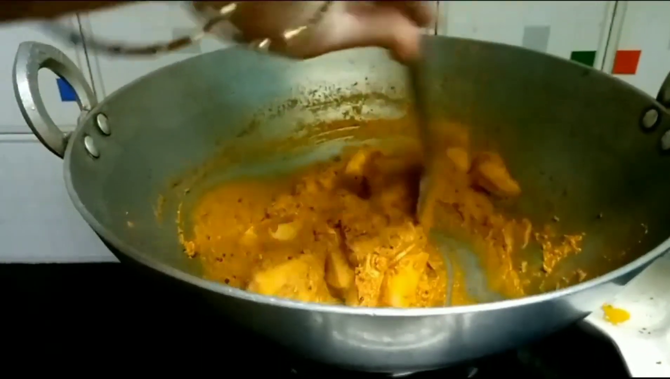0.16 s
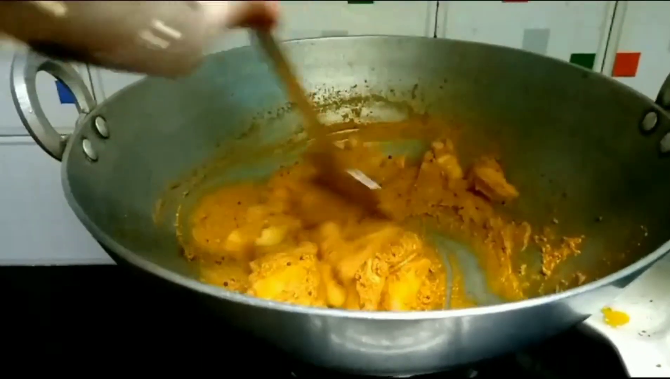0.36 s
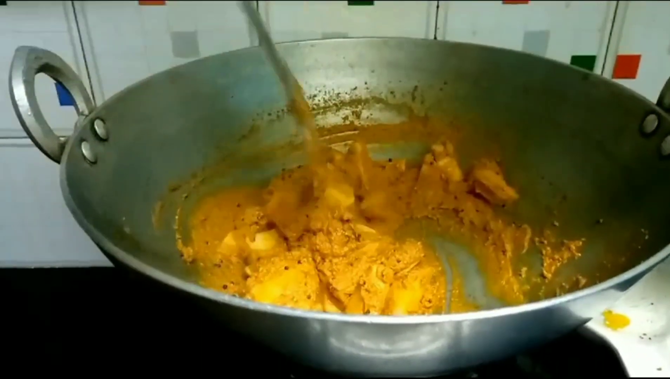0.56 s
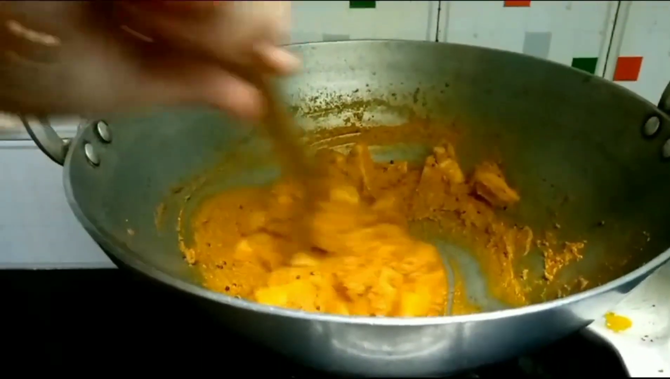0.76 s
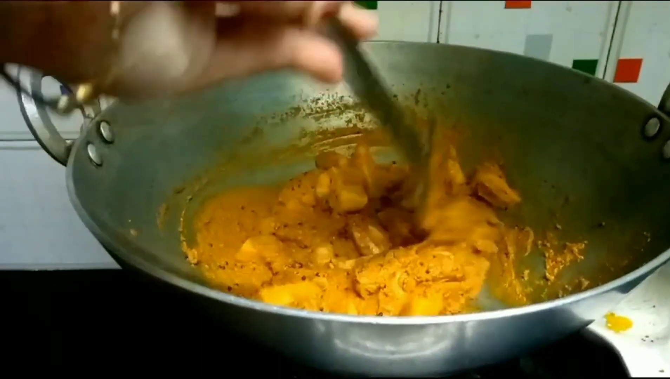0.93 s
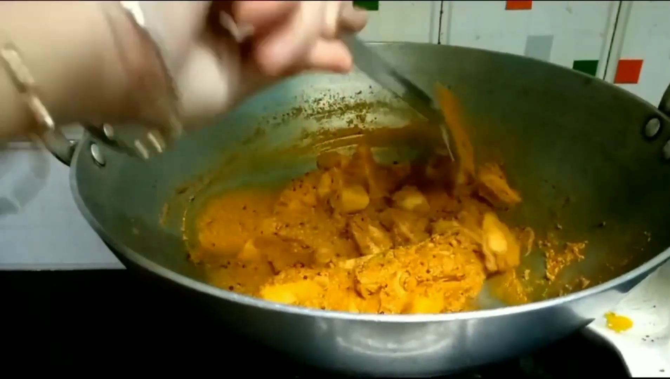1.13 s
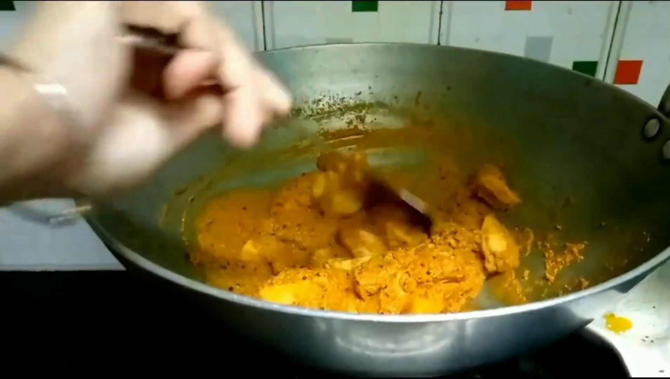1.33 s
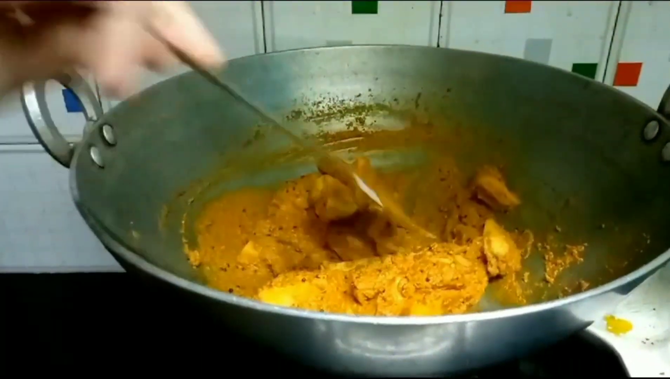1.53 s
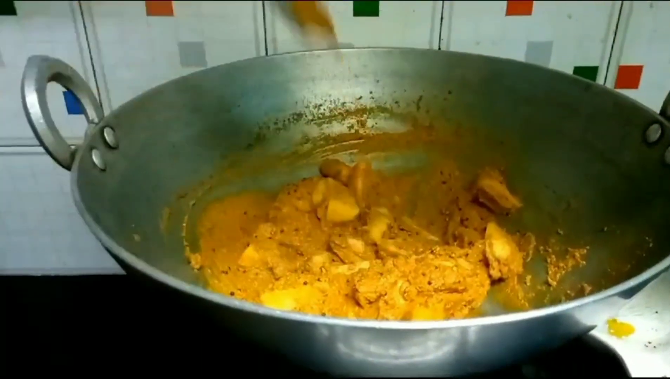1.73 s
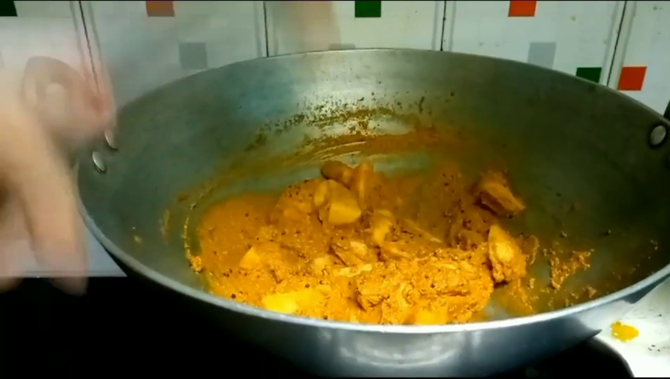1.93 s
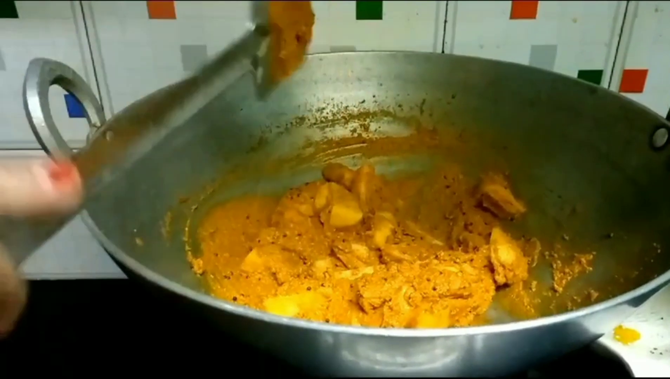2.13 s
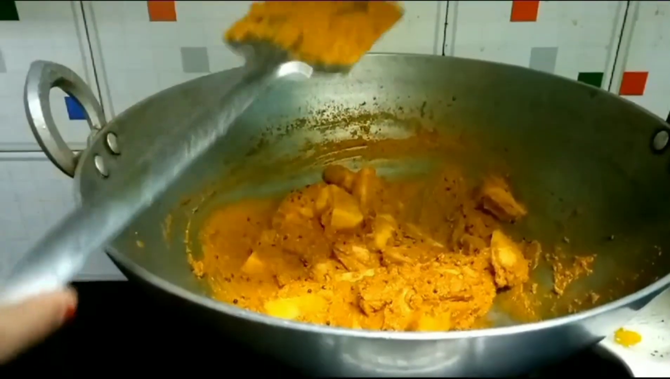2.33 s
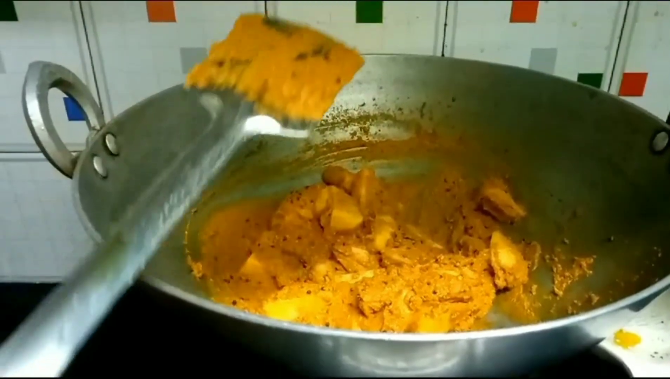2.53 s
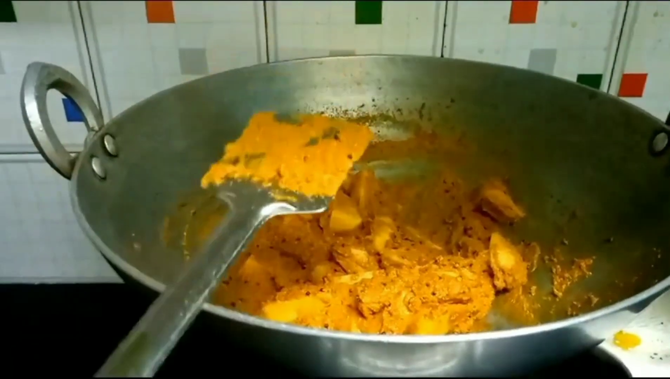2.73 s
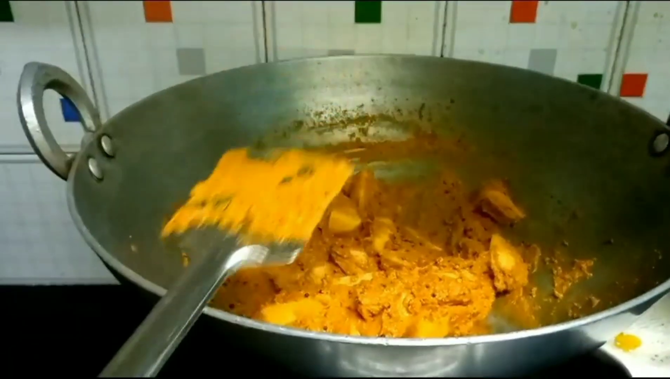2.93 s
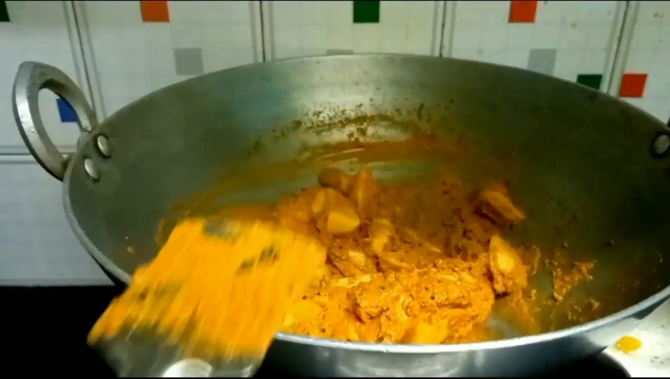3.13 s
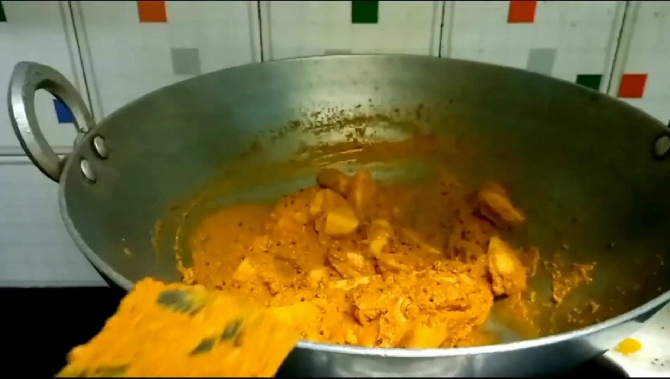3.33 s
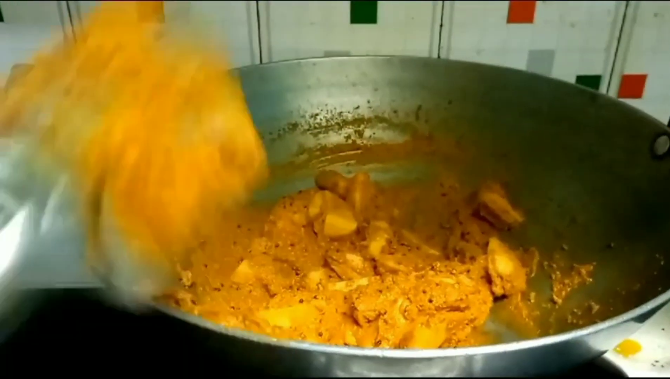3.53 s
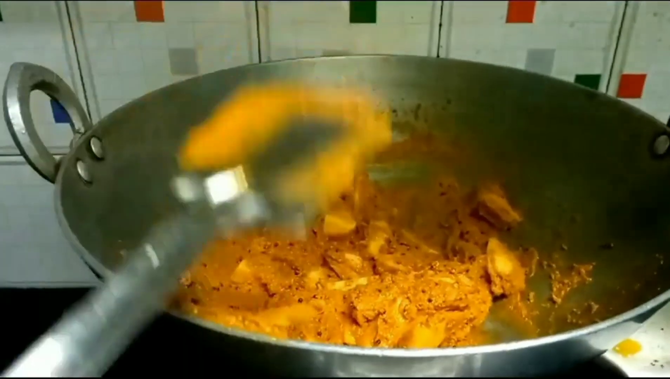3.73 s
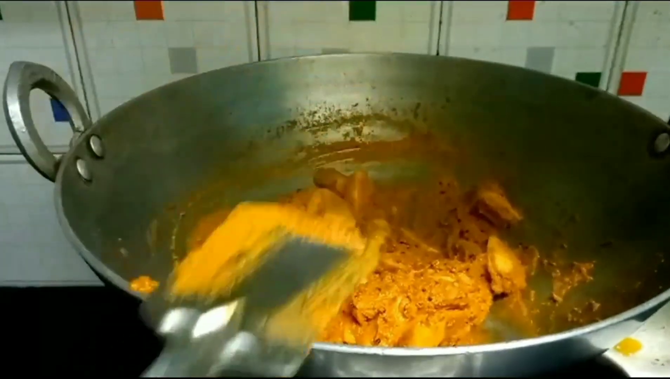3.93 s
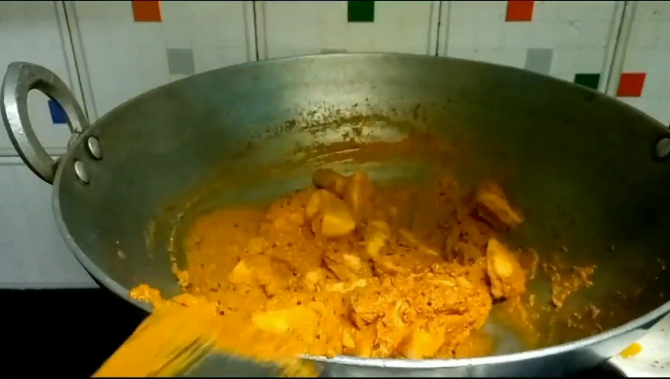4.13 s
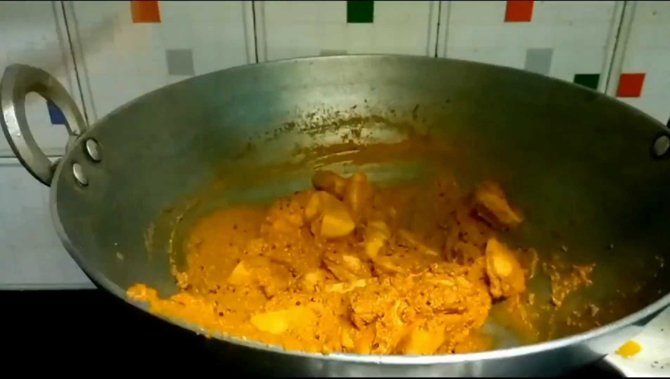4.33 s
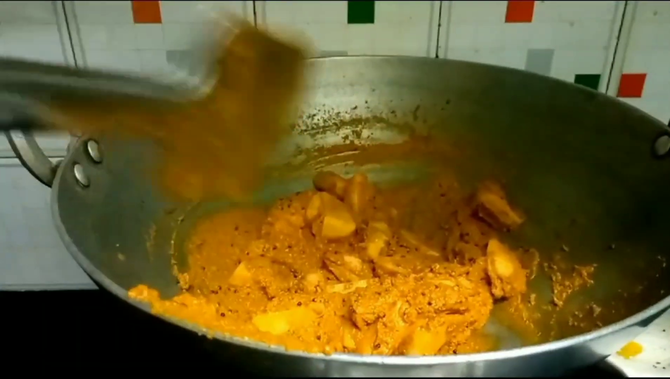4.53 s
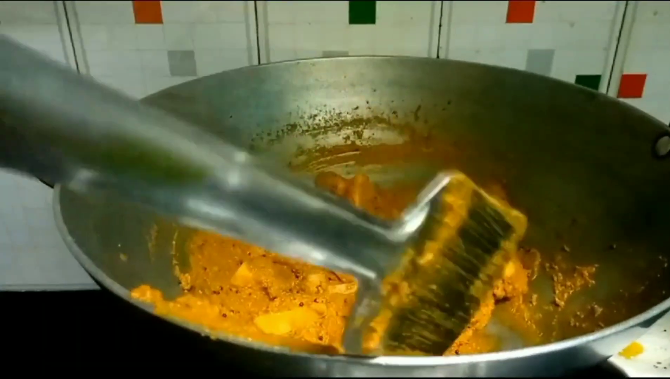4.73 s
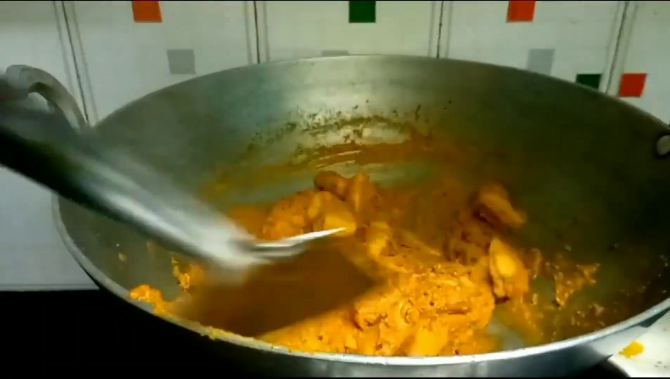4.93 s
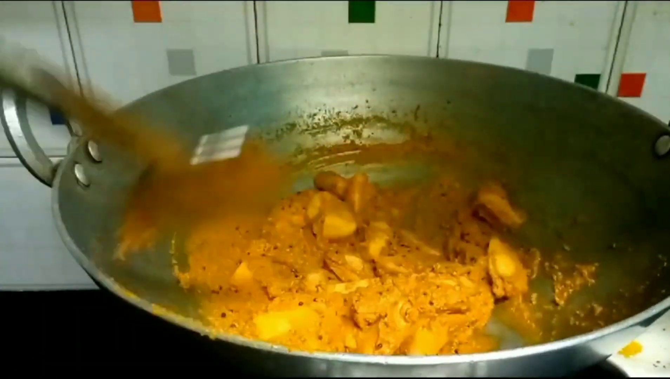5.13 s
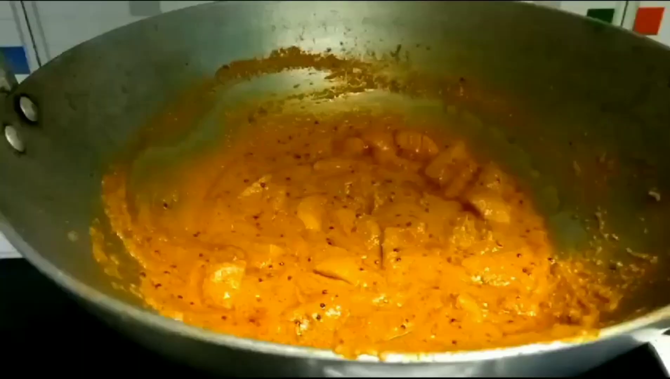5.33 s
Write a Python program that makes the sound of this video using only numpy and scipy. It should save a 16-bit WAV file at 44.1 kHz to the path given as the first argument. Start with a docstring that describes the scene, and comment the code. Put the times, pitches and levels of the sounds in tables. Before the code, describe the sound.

Wet stirring and tiny steam pops give way to sharp clinks and scrapes of a spatula on a pan, ending in a brief sizzle.

```python
"""In a small tiled kitchen, a steel spatula works thick potato paste in a round metal pan.
Stick-slip friction makes the blade scrape, the paste squelches as it tears, and steam pockets pop.
Impacts excite damped modes: the pan knocks dully on its stand, a bracelet jingles, the blade clinks.
A low hum lies beneath. Near the end the sound drops out for an instant and returns with a fine sizzle."""
import sys
import numpy as np
from scipy import signal
from scipy.fft import rfft, irfft, next_fast_len
from scipy.io import wavfile
from scipy.ndimage import uniform_filter1d, map_coordinates

SR = 44100
rng = np.random.default_rng(int(sys.argv[2]) if len(sys.argv) > 2 else 0)


def dump(signal):
    """Clip the signal to [-1, 1] and save it as 16-bit WAV at the path in sys.argv[1]."""
    limited = np.clip(np.atleast_2d(signal).T, -1, 1)
    pcm = np.round(limited * 32767).astype(np.int16)
    wavfile.write(sys.argv[1], SR, pcm)


N = 241315
TIME = np.arange(N) / SR
RING_TIME = np.arange(SR // 3) / SR  # time since a contact [s]


def amp(db):
    """Amplitude ratio of a level in decibels."""
    return 10 ** (np.asarray(db) / 20)


def unit(x):
    """Normalisation to rms 1."""
    return x / np.sqrt(np.mean(x ** 2))


def fade(t60):
    """Exponential decay by 60 dB in t60 seconds."""
    return np.exp(-np.log(1000) * RING_TIME / t60)


def colour(spectrum, hz):
    """Spectral envelope: gain from levels interpolated over log frequency."""
    f, db = np.transpose(spectrum)
    return amp(np.interp(np.log(hz), np.log(f), db))


def bell(f, hz, octaves):
    """Gaussian band of height 1 over log frequency."""
    return np.exp(-(np.log2(f / hz) / octaves) ** 2 / 2)


def walk(rate_hz):
    """Smooth random modulation of rms 1."""
    knots = rng.standard_normal(1000)
    return unit(map_coordinates(knots, [TIME * rate_hz], order=3, mode="wrap"))


def gesture(s, length, attack_s, release_t60):
    """Envelope of a hand movement: linear attack, hold, exponential release."""
    release = np.exp(-np.log(1000) * np.maximum(TIME - s - length, 0) / release_t60)
    return np.clip((TIME - s) / attack_s, 0, 1) * release


def noise(gain_at, size=len(RING_TIME), coherent_hz=720):
    """Spatial coherence: coloured noise at two microphones, alike in the bass, unrelated in the treble."""
    length = next_fast_len(size)
    hz = np.maximum(np.fft.rfftfreq(length, 1 / SR), 1)
    mid, side = rfft(rng.standard_normal((2, length)))
    coherence = .96 / (1 + (hz / coherent_hz) ** 3)
    mid, side = mid * np.sqrt(1 + coherence), side * np.sqrt(1 - coherence)
    return unit(irfft(np.array([mid + side, mid - side]) * gain_at(hz), length)[:, :size])


def modes(hz, gains, t60s, split=0.0028):
    """Mode splitting: damped sines beat in close pairs, detuned anew by each contact."""
    out = 0
    for f, gain, t60 in zip(hz, gains / np.linalg.norm(gains), t60s):
        # higher modes reach the two microphones out of phase
        lag = rng.choice([-1, 1]) * min(f / 1100, 1) * np.pi / 4
        phase = rng.uniform(0, 2 * np.pi) + np.array([[lag], [-lag]])
        lower_hz, upper_hz = f * (1 + split * np.array([-1, 1]) * rng.uniform(0, 2.4, 2))
        lower = np.sin(2 * np.pi * lower_hz * RING_TIME + phase)
        upper = np.cos(2 * np.pi * upper_hz * RING_TIME + phase[::-1])
        out = out + gain * (lower + upper) * fade(t60)
    return out


def add(out, s, sound):
    """Superposition of a sound starting at time s."""
    start = int(s * SR)
    out[:, start:start + sound.shape[1]] += sound[:, :N - start]


def through(x, response):
    """Convolution with an impulse response of unit mean energy per channel."""
    response = response / np.sqrt(np.sum(response ** 2) / 2)
    return signal.fftconvolve(np.atleast_2d(x), response, axes=1)[:, :N]


def grains(rate_hz, spread_db):
    """Shot noise: impulses of uneven size at random moments."""
    size = amp(spread_db * np.clip(rng.standard_normal(N), -2, 2))
    return unit((rng.random(N) < rate_hz / SR) * size * rng.choice([-1, 1], N))


# Room rumble and hiss: (frequency [Hz], density level [dB])
ROOM_SPECTRUM = [(20, -42.5), (32, -11.5), (47, -3.5), (72, -16), (104, -3.5), (195, -13), (295, -9),
                 (700, -21), (1200, -27.5), (2000, -28.5), (3500, -38), (7000, -46), (9000, -43),
                 (12500, -47.5), (16000, -56)]
# Tones of the hum: (frequency [Hz], relative level [dB], rms deviation [Hz])
HUM_TONES = [(101.8, 0, 4.55), (148.7, -8.5, 3.2), (282, -9.5, 9.3)]


def room_tone(air_db=-47.5, hum_db=-52, waver_db=-0.5, step_db=6.5, step_s=2.26, rise_s=0.039):
    """Tones over broadband noise: the rumble swells once, and a wavering hum steps up and stays up."""
    swell_db = 5.26 * np.exp(-(TIME - 3.6) ** 2)  # peaks at 3.6 s
    air = noise(lambda f: colour(ROOM_SPECTRUM, f), N) * amp(air_db + swell_db)
    hum = 0
    for hz, db, deviation_hz in HUM_TONES:
        phase = 2 * np.pi * np.cumsum(hz + deviation_hz * walk(12)) / SR
        hum = hum + unit(np.sin(phase) * amp(waver_db * walk(14))) * amp(db)
    step = np.clip((TIME - step_s) / rise_s, 0, 1)
    drift_db = walk(2.9)
    return air + hum * amp(hum_db + step_db * step + drift_db)


# Pan modes, also struck in clinks():
# (frequency [Hz], level at the rim [dB], level in the bowl [dB], T60 before added damping [s])
PAN_MODES = [(438, -11, -7, .2), (582, -6, -9, .19), (772, -12, -4, .18), (1066, -12, -10, .22),
             (1232, -16, -6, .2), (1430, -3, -4, .18), (1654, -7, -7, .16), (2112, -3, 0, .17),
             (2222, -3, -1, .26), (2544, -1, -8, .15), (2624, 5, -5, .28), (2745, -8, 0, .28),
             (2794, -9, -4, .34), (3149, 3, 0, .21), (3252, -3, -5, .21), (3758, -22, -7, .2),
             (4021, -9, -9, .2), (4462, -3, -5, .26), (4548, -5, -8, .17), (5130, -15, -9, .22),
             (5455, -18, -6, .15), (6546, -11, -10, .16), (8473, -10, -13, .15)]
# Friction noise of one slip: (frequency [Hz], density level [dB])
RASP_SPECTRUM = [(50, -25), (150, -13), (400, -3), (950, -4), (1300, -3.5), (2800, -0.5), (3600, -7.5),
                 (4500, -1), (7000, -12), (8600, -12.5), (13000, -17.5), (16000, -30)]
# Blade strokes, one list per place of contact:
# (time [s], duration [s], final level [dB], growth [dB], treble gain [dB])
BLADE_STROKES = [
    [(-0.022, 0.066, -36, -4.5, 8.5)],
    [(2.83, 0.17, -41.5, 10, 5), (3.015, 0.057, -28, -7, -2.5)],
    [(4.76, 0.19, -21, 14, 5.5)],
]
# Response at each place: (pan level [dB], blade level [dB], blade modes (frequency [Hz], weight [dB]))
CONTACT_RESPONSES = [(-24, -1.6, [(450, 13), (900, 5), (3750, 8), (4150, 11), (4550, -5)]),
                     (-8, -1.2, [(770, 10), (1420, 3.5), (1920, 10.5), (2230, 10), (2600, 12)]),
                     (-12.5, 1, [(880, -8), (1230, 6), (1410, 0), (1670, 4), (2120, 5), (2760, 4.5),
                     (4130, -1), (4650, -7), (5150, 1), (7850, -11), (8650, -25)])]


def scrapes(rasp_t60=0.031, blade_cycles=50, t60_share=0.42, choke_hz=3500, chatter_db=3, attack_s=0.014):
    """Stick-slip friction: each slip rings the blade and the pan, whose high modes the blade chokes."""
    out = np.zeros((2, N))
    hz, _, bowl_db, t60s = np.transpose(PAN_MODES)
    lowpass = signal.butter(2, 3500, fs=SR, output="sos")
    for strokes, (pan_db, blade_db, blade_modes) in zip(BLADE_STROKES, CONTACT_RESPONSES):
        slips = unit(grains(rate_hz=2200, spread_db=2.0) * amp(chatter_db * walk(170)))
        low = signal.sosfiltfilt(lowpass, slips)
        force = 0
        for s, length, db, growth_db, treble_db in strokes:
            remaining = np.clip(1 - (TIME - s) / length, 0, 1)
            body = low * gesture(s, length, attack_s, release_t60=0.18)
            # the treble dies first as the blade lifts
            treble = (slips - low) * gesture(s, length, attack_s, release_t60=0.14)
            force = force + amp(db - growth_db * remaining) * (body + amp(treble_db) * treble)
        rasp = noise(lambda f: colour(RASP_SPECTRUM, f)) * fade(rasp_t60)
        blade_hz, weight_db = np.transpose(blade_modes)
        blade = modes(blade_hz, amp(weight_db) * np.sqrt(blade_hz), blade_cycles / blade_hz)
        pan = modes(hz, amp(bowl_db), t60s * t60_share / np.hypot(1, hz / choke_hz))
        out += through(force, rasp + amp(blade_db) * blade + amp(pan_db) * pan)
    return out


# Tearing paste: (frequency [Hz], density level [dB])
SQUELCH_SPECTRUM = [(50, -20), (150, -7), (400, 13.5), (900, 2), (2000, -1.5), (5200, -1), (7000, -9.5),
                    (12000, -6), (16000, -12)]
# Pushes through the paste: (time [s], duration [s], level [dB], cavity resonance [Hz])
PASTE_PUSHES = [(0, .26, -50, 1180), (0.71, 0.064, -47, 2700), (1.228, .08, -63, 3600)]


def squelches(cavity_db=4, cavity_octaves=.5, tearing_db=8.5):
    """Cavity resonance: wet paste tears unevenly, and the hollow behind the blade colours the swish."""
    swish = 0
    for s, length, db, hz in PASTE_PUSHES:
        cavity = lambda f: amp(cavity_db * bell(f, hz, cavity_octaves))
        tearing = noise(lambda f: colour(SQUELCH_SPECTRUM, f) * cavity(f), N)
        swish = swish + tearing * amp(db) * gesture(s, length, attack_s=0.034, release_t60=0.33)
    return swish * unit(amp(tearing_db * np.tanh(walk(220))))


# A bursting steam pocket: (frequency [Hz], density level [dB])
POP_SPECTRUM = [(800, -30), (3000, -14), (4400, 1), (5600, -1.5), (7500, -8), (9000, -3.5), (12500, -5),
                (16000, -7)]
# The loudest pops: (time [s], level [dB], band centre [Hz])
LOUD_POPS = [(0.454, -49.5, 11300), (.703, -58, 6000), (.725, -49, 6000), (0.846, -41.5, 6300),
             (1.094, -52, 7050), (1.251, -53, 5000)]


def steam_pops(t60=0.028, octaves=0.57, tail_db=-17, tail_t60=0.13, small_count=44, stir_s=1.55):
    """Pressure release: pockets of steam burst as short bands of noise while the paste is stirred."""
    out = np.zeros((2, N))
    small_pops = [(stir_s * (k + when) / small_count, -64 + 4 * size, 12000 * 2 ** (pitch - .5))
                  for k, (when, size, pitch) in enumerate(rng.random((small_count, 3)))]
    envelope = fade(t60) + amp(tail_db) * fade(tail_t60)
    for s, db, hz in LOUD_POPS + small_pops:
        pop = noise(lambda f: colour(POP_SPECTRUM, f) * bell(f, hz, octaves))
        add(out, s, amp(db) * pop * envelope)
    return out


# Modes of the pan on its stand: (frequency [Hz], level [dB], T60 [s])
STAND_MODES = [(283, -1, 0.065), (290.4, -3.5, 0.16), (300, -14, 0.067), (927, -15, 0.19),
               (1188, -14.5, 0.19), (1590, -14, 0.031), (2070, -25, 0.069)]
# Thud of a landing: (frequency [Hz], density level [dB])
THUD_SPECTRUM = [(30, -45), (80, -6), (200, -8), (300, -13), (480, 0.5), (750, -3.5), (1300, -3.5),
                 (2700, -7.5), (3800, -13), (5200, -18), (9000, -15.5), (16000, -27)]
# Shoves of the pan: (time [s], level [dB], contact corner frequency [Hz], rebound interval [s])
PAN_SHOVES = [(.093, -28.5, 610, 0.018), (.152, -25.5, 4400, 0.028), (.236, -33, 7000, 0.05),
              (3.182, -30.5, 1300, 0.033), (3.207, -28.5, 1080, .052), (3.409, -32.5, 5800, .023),
              (4.196, -30, 6560, 0.058), (4.236, -30, 5870, 0.026), (4.341, -33.5, 2400, 0.041),
              (4.367, -33, 4440, 0.023), (4.714, -35, 1030, 0.042)]


def knocks(thud_t60=0.072, ring_db=-1, rise_cycles=2, rebound_hz=430, seating_spread=.12):
    """Contact time limits bandwidth: the pan knocks on its stand, then falls back twice, soft and dull."""
    out = np.zeros((2, N))
    hz, mode_db, t60s = np.transpose(STAND_MODES)
    for start, shove_db, shove_hz, rock_s in PAN_SHOVES:
        contacts = [(start, shove_db, shove_hz),
                    (start + rock_s, shove_db - 1, rebound_hz),
                    (start + 2 * rock_s, shove_db - 7, rebound_hz)]
        for s, db, corner_hz in contacts:
            lowpass = lambda f: 1 / (1 + (f / corner_hz) ** 2)
            thud = noise(lambda f: colour(THUD_SPECTRUM, f) * lowpass(f)) * fade(thud_t60)
            # each landing seats the pan anew and shifts its lowest modes
            seated_hz = hz * (1 + seating_spread * rng.uniform(-1, 1) * (hz < 500))
            ring = modes(seated_hz, amp(mode_db) * lowpass(hz), t60s)
            rise = 1 - np.exp(-RING_TIME * corner_hz / rise_cycles)
            add(out, s, amp(db) * (thud + amp(ring_db) * ring) * rise)
    return out


# Modes of the bracelet links: (frequency [Hz], level [dB], T60 [s])
LINK_MODES = [(5150, 1, 0.052), (6000, 3.5, 0.034), (8700, -7, 0.03), (11400, 2.5, 0.039),
              (11800, -4, 0.038), (11300, 1.5, 0.044), (13200, 3, 0.046), (14200, -7, 0.027)]
# Links touching as the wrist turns: (time [s], level [dB], band centre [Hz])
LINK_TOUCHES = [(1.408, -54, 11000), (1.785, -53.5, 10000), (1.884, -46.5, 7550), (1.909, -49.5, 7400),
                (2.12, -54.5, 10000), (2.282, -39, 9050), (3.364, -48, 8500), (3.517, -40, 12500)]


def bracelet(tick_db=-2, tick_t60=0.034, rise_s=0.00059, octaves=0.99, graze_s=0.0044, graze_db=-7):
    """Small bodies have high modes: metal links graze, then tick together and ring briefly."""
    out = np.zeros((2, N))
    hz, link_db, t60s = np.transpose(LINK_MODES)
    highpass = lambda f: 1 / np.hypot(1, (5000 / f) ** 4)
    rise = 1 - np.exp(-RING_TIME / rise_s)
    for s, db, centre_hz in LINK_TOUCHES:
        graze, tick = (noise(highpass) * fade(tick_t60) for _ in range(2))
        link_hz = hz * (1 + .04 * rng.uniform(-1.1, 1))  # no two links are alike
        ring = modes(link_hz, amp(link_db) * bell(hz, centre_hz, octaves), t60s, split=0.016)
        add(out, s - graze_s, amp(db + graze_db) * graze * rise)
        add(out, s, amp(db) * (ring + amp(tick_db) * tick) * rise)
    return out


# The pan's dense, short-lived modes: (frequency [Hz], density level [dB])
CLANG_SPECTRUM = [(150, -41), (330, -17.5), (520, -14), (950, -7), (1400, -6.5), (3100, -7.5), (3650, -14),
                  (4400, -1), (7300, -10.5), (8800, -6.5), (13000, -15), (16000, -30)]
# Blade strikes: (time [s], level [dB], tilt [dB/octave], nearness to the rim [0-1], ring level [dB])
BLADE_STRIKES = [(2.717, -28.5, 2.7, 0, -9.5), (2.862, -33, -0.5, 0, -9), (3.007, -33.5, -3.5, 0.8, -5.5),
                 (3.026, -26, 19, 0.7, -11), (3.069, -44.5, -2.5, 0.3, 11.5), (3.8588, -18.5, 14, 1, -10),
                 (3.8620, -9.5, -2, 0.9, -8.5), (4.078, -30, -0.5, 0, -13.5), (4.149, -42.5, 0.5, 0.4, -14),
                 (4.712, -16, -1.6, 0, -11), (4.817, -32.5, -5, .2, -8), (4.959, -19.5, 8, 0.4, -4)]


def clinks(clang_t60=0.055, crack_db=-3, crack_t60=0.014, early_db=7, early_t60=0.097, t60_share=.62):
    """Impact excitation: steel meets the pan with a crack, a clang and modes set by the strike point."""
    out = np.zeros((2, N))
    hz, rim_db, bowl_db, t60s = np.transpose(PAN_MODES)
    rise = 1 - np.exp(-RING_TIME / 0.001)
    for s, db, tilt_db, rim, ring_db in BLADE_STRIKES:
        tilt = lambda f: amp(tilt_db * np.log2(f / 1000))
        spectrum = lambda f: colour(CLANG_SPECTRUM, f) * tilt(f)
        clang = noise(spectrum) * fade(clang_t60)
        crack = noise(lambda f: spectrum(f) / np.hypot(1, 6000 / f)) * fade(crack_t60)
        mode_db = bowl_db + rim * (rim_db - bowl_db)
        ring = modes(hz, amp(mode_db) * tilt(hz), t60s * t60_share)  # the food damps the pan
        ring = ring * (1 + amp(early_db) * fade(early_t60))  # fast early loss to the blade
        add(out, s, amp(db) * (amp(crack_db) * crack + clang + amp(ring_db) * ring) * rise)
    return out


DROPOUT_START_S, DROPOUT_END_S = 5.25, 5.308
# Fizzing oil: (frequency [Hz], density level [dB])
SIZZLE_SPECTRUM = [(2000, -13), (4500, -15.5), (6300, -10.5), (7600, -5), (10000, -7.5), (12400, 3.5),
                   (14000, -5), (16000, -7)]


def sizzle(level_db=-42.5, swell_s=0.012, flicker_db=1.0):
    """Amplitude-modulated noise: hot oil fizzes in a fine flicker from the end of the dropout on."""
    fizz = noise(lambda f: colour(SIZZLE_SPECTRUM, f), N) * amp(flicker_db * walk(600))
    return fizz * amp(level_db) * np.clip((TIME - DROPOUT_END_S) / swell_s, 0, 1)


def tiles(x, t60=0.33, wet_db=-6, first_s=0.0026, dull_hz=10000, bass_hz=300):
    """Reverberation: hard walls close by return a short, bright tail with little bass."""
    walls = lambda f: 1 / np.hypot(1, f / dull_hz) / np.hypot(1, bass_hz / f)
    tail = noise(walls) * fade(t60) * np.clip(RING_TIME / first_s - 1, 0, 1)
    return x + amp(wet_db) * through(x, tail)


def scene():
    """Superposition: the sounds at the stove reverberate over the room tone."""
    stove = scrapes() + squelches() + steam_pops() + knocks() + bracelet() + clinks() + sizzle()
    return tiles(stove) + room_tone()


# Imbalance of the two microphone ports: (frequency [Hz], left minus right level [dB])
PORT_BALANCE = [(500, 0.5), (1100, 1.5), (2400, -6.5), (4500, 0), (8500, -4), (14000, -2)]


def record(dry, ceiling=1.3, murk_db=-13, murk_hz=2400, top_hz=15800):
    """Filtering and saturation: ports colour the sound, peaks round off, it dips to a murk, the top is cut."""
    length = next_fast_len(N)
    hz = np.maximum(np.fft.rfftfreq(length, 1 / SR), 1)
    balance = np.sqrt(colour(PORT_BALANCE, hz))
    heard = irfft(rfft(dry, length) * np.array([balance, 1 / balance]), length)[:, :N]
    heard = ceiling * np.tanh(heard / ceiling)
    dropout = uniform_filter1d(((TIME > DROPOUT_START_S) & (TIME < DROPOUT_END_S)) * 1., size=200)
    murk = amp(murk_db) * signal.sosfilt(signal.butter(4, murk_hz, fs=SR, output="sos"), heard)
    top_cut = signal.ellip(10, .2, 80, top_hz, fs=SR, output="sos")
    return signal.sosfilt(top_cut, heard * (1 - dropout) + murk * dropout)


dry = scene()
out = record(dry)
dump(out)
```